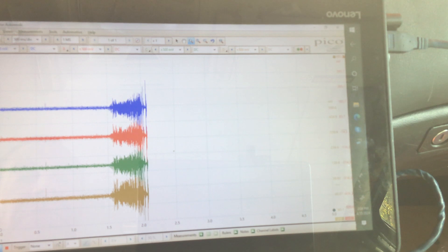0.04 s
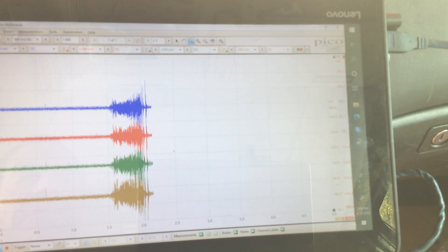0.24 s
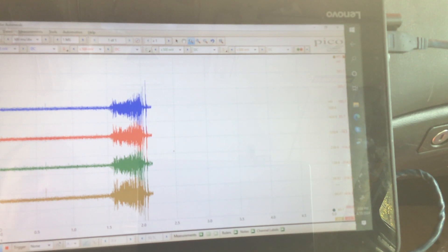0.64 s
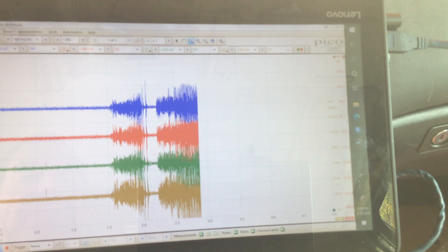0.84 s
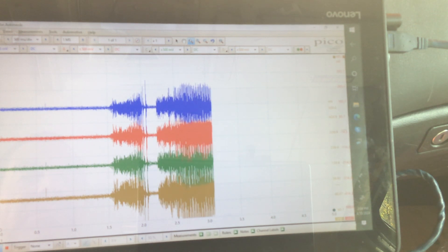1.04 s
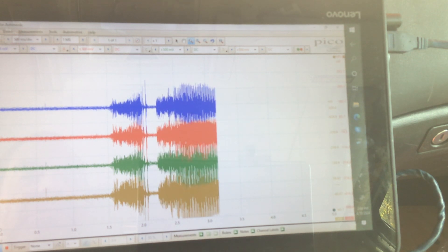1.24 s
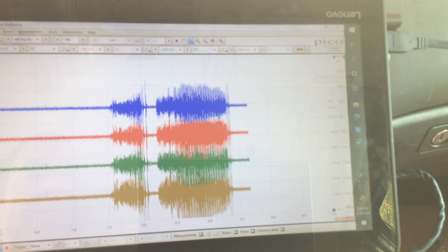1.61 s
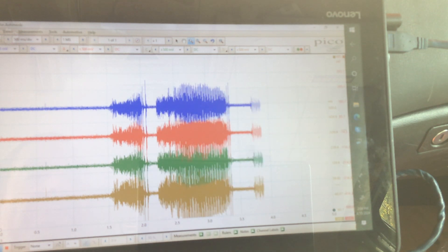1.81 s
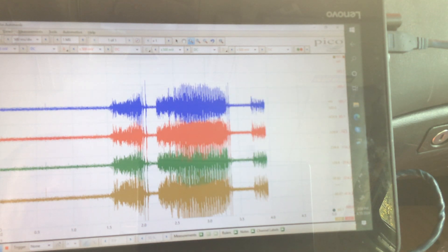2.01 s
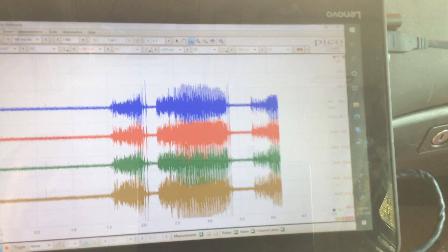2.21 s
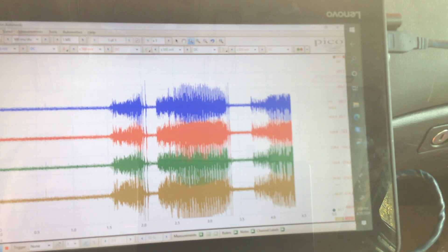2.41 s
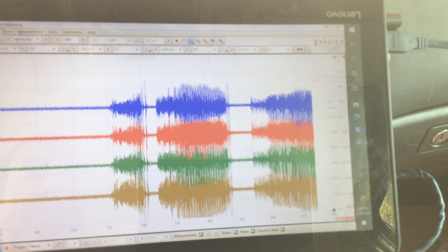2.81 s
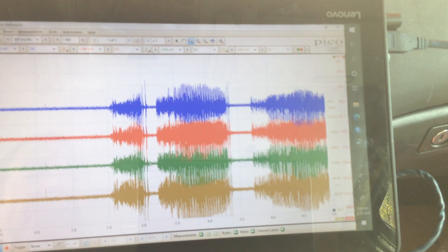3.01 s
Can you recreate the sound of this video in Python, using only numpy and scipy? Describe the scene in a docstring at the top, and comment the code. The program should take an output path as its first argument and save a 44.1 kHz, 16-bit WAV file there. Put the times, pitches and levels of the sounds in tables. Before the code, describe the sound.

A car's front suspension joint groans in swells as the steering turns, heard from inside.

```python
"""A front suspension joint groans by stick-slip friction as the steering of an idling car is worked to and
fro, heard from inside. Each stroke starts as an uneven rub, locks into regular slips near 120 Hz that
boom in the cabin and excite the body's resonances, then breaks up again; a third stroke just begins.
A hiss with narrow resonances, probably the steering fluid, follows the load. Short creaks and metallic
scrapes come within the strokes, and the engine hums underneath."""
import sys
import numpy as np
from scipy import signal
from scipy.fft import rfft, irfft, next_fast_len
from scipy.io import wavfile
from scipy.ndimage import map_coordinates

SR = 44100
rng = np.random.default_rng(int(sys.argv[2]) if len(sys.argv) > 2 else 0)


def put_to_file(sound):
    """Save the sound as 16-bit audio at rate SR, in the file named by the first command-line argument."""
    columns = np.atleast_2d(sound).T  # one column per channel
    safe = np.clip(columns, -1, 1)
    whole_steps = np.round(safe * 32767)
    wavfile.write(sys.argv[1], SR, whole_steps.astype(np.int16))


N = 138915

# resonances of body and cabin: f/Hz, half-width/Hz, relative level/dB
BODY_MODES = [(212, 18.3, 2.5), (289.4, 24, -4.5), (321, 11, -8.5), (389.8, 21.7, 1), (424, 16, -3.5),
              (446, 29, -9.5), (509.7, 13.5, -0.5), (560, 12, -14.5), (643.8, 17, -9), (675.5, 13, -4),
              (825.6, 34, -12.5), (861, 14, -23.5), (931, 26, -21.5), (998, 34, -15), (1076, 19, -13.5),
              (1135, 19, -18.5)]
# spectral envelope of hiss and buzz: f/Hz, relative level/dB
HISS_SPECTRUM = [(600, -15.5), (1150, -4), (1600, 1.5), (2100, -2.5), (2800, -3.5), (3050, -2),
                 (3750, -3.5), (4100, -9.5), (4450, -9), (4750, -12.5), (5600, -10), (6400, -17),
                 (7300, -15), (8100, -21.5), (9000, -20.5), (10300, -24.5), (12000, -34.5), (15500, -36)]
SLIP_PULSE_DEPTH = .14  # amplitude modulation of hiss and scrapes at the slip rate


def amp(db):
    """Amplitude ratio of a level in decibels."""
    return 10 ** (np.asarray(db) / 20)


def unit(x):
    """Normalisation to rms 1."""
    return x / np.sqrt(np.mean(x ** 2) + 1e-20)


def curve(rows):
    """Linear interpolation of (t/s, value) rows at every sample."""
    return np.interp(np.arange(N) / SR, *np.transpose(rows))


def wobble(knots_per_s):
    """Smooth random modulation: a spline through Gaussian values."""
    return map_coordinates(rng.standard_normal(N), [np.arange(N) * knots_per_s / SR + 2])


def colour(points, hz):
    """Spectral envelope: gain from (f/Hz, level/dB) points on a logarithmic frequency axis."""
    f, db = np.transpose(points)
    return amp(np.interp(np.log(hz + 1), np.log(f + 1), db))


def resonances(modes, hz):
    """Modal superposition: the gain is a sum of Lorentzian peaks."""
    return sum(amp(db) / (1 + ((hz - centre) / half_width) ** 2) for centre, half_width, db in modes)


def filtered(x, response):
    """Linear filtering: the spectrum is multiplied by a frequency response."""
    size = next_fast_len(N + SR // 2)
    return irfft(rfft(x, size) * response(np.fft.rfftfreq(size, 1 / SR)), size)[:N]


def noise(response):
    """Spectral shaping of white noise, at rms 1."""
    return unit(filtered(rng.standard_normal(N), response))


def ringing(modes):
    """Random excitation of resonances: bands of noise, together at rms 1."""
    return noise(lambda hz: resonances(modes, hz))


def cabin(x, t60_s=0.11, reflections_db=11.5):
    """Reverberation: dense reflections from glass and trim decay exponentially; the level is kept."""
    t = np.arange(SR // 5) / SR
    tail = rng.standard_normal(len(t)) * amp(-60 * t / t60_s)
    reflections = signal.fftconvolve(x, tail / np.linalg.norm(tail))[:N]
    return (x + amp(reflections_db) * reflections) / np.sqrt(1 + amp(reflections_db) ** 2)


def engine_idle(rumble_db=-47, waver_db=3.5):
    """Line spectrum over a continuum: the engine's wavering hum on a soft rumble."""
    # partials of the hum: f/Hz, level/dB
    partials = [(53, -60.5), (80.7, -53), (127, -54.5)]
    # spectral envelope of the rumble: f/Hz, relative level/dB
    spectrum = [(25, -22), (40, -18), (60, -4.5), (85, 2.5), (135, 6.5), (200, -13), (270, -7.5),
                (400, -23.5), (700, -21.5), (1000, -33.5), (1500, -28), (2500, -35.5), (3500, -35.5),
                (5000, -42.5), (8000, -49.5), (11000, -52.5), (15500, -62)]
    t, hum = np.arange(N) / SR, np.zeros(N)
    for hz, db in partials:
        hum += amp(db + waver_db * wobble(14)) * np.sin(2 * np.pi * hz * t + .5 * wobble(8.2))
    return np.sqrt(2) * hum + amp(rumble_db) * noise(lambda hz: colour(spectrum, hz))


def slip_buzz(phase):
    """Harmonics of a sharp edge: each slip carries high orders, scattered in phase and level."""
    edge = sum(np.cos(k * phase + rng.uniform(0, 2 * np.pi)) * amp(3 * wobble(12)) for k in range(10, 40))
    return unit(filtered(edge, lambda hz: colour(HISS_SPECTRUM, hz)))


def steering_hiss(phase, lock, rings_db=-5, buzz_db=-11, trim_db=0.5):
    """Amplitude modulation: hiss under load, with rings, buzz and a whistle, pulses with each slip."""
    # envelope of the hiss: t/s, relative level/dB
    hiss_level = [(0, -64), (.03, -72), (.08, -63), (.35, -60), (.47, -57), (.75, -56), (1.0, -56.5),
                  (1.19, -59.5), (1.225, -65), (1.39, -72.5), (1.52, -72), (1.56, -67), (1.73, -66),
                  (1.85, -56), (1.99, -58.5), (2.3, -57), (2.5, -57), (2.72, -60.5), (2.89, -58.5),
                  (2.92, -69.5), (3.09, -72), (3.13, -59), (3.15, -59)]
    # resonances of the metalwork: f/Hz, half-width/Hz, relative level/dB
    metal_modes = [(1465, 20, -4), (1530, 30, -4), (1737, 20, -1), (1883, 18, -1), (2022, 45, -2),
                   (2289, 16, -2), (2570, 70, -5), (3090, 45, -3), (3480, 110, -6), (3800, 40, -7),
                   (4310, 55, 0), (5070, 40, -11), (5830, 50, -12), (7472, 60, -14), (8630, 70, -16)]
    # bands of the first stroke's thin whistle: f/Hz, half-width/Hz, relative level/dB
    whistle_bands = [(7950, 110, -11), (8550, 95, 2)]
    # envelope of the whistle: t/s, level/dB
    whistle_level = [(0, -98), (.2, -91), (.36, -79.5), (.48, -77), (.75, -76.5), (.95, -80), (1.15, -82),
                     (1.25, -108)]
    broadband = unit(cabin(noise(lambda hz: colour(HISS_SPECTRUM, hz))))
    hiss = unit(broadband + amp(rings_db) * ringing(metal_modes))
    hiss += amp(buzz_db) * lock * slip_buzz(phase)
    hiss *= amp(curve(hiss_level) + trim_db)
    whistle = ringing(whistle_bands) * amp(curve(whistle_level))
    flicker = amp(0.27 * wobble(77))
    return (hiss + whistle) * (1 + SLIP_PULSE_DEPTH * np.sin(phase)) * flicker


def metal_scrapes(phase):
    """Noise-excited resonance: metal rings briefly, swelling and fading, pulsing at the slip rate."""
    # scrapes: start t/s, duration/s, level/dB, modes as (f/Hz, half-width/Hz, relative level/dB)
    scrapes = [(.7, 0.53, -60.5, [(2010, 100, -1), (2953, 25, 5), (3030, 50, -4.5), (3440, 120, -11.5),
               (5500, 720, -15.5), (13900, 1900, -32)]), (1.75, 0.28, -60.5, [(1520, 110, -2),
               (3210, 55, 0), (3530, 88, 0), (5320, 150, -7), (7000, 300, -15.5)])]
    t, out = np.arange(N) / SR, np.zeros(N)
    for start, duration, db, modes in scrapes:
        progress = np.clip((t - start) / duration, 0, 1)
        out += amp(db) * np.sin(np.pi * progress) * ringing(modes)
    return out * (1 + SLIP_PULSE_DEPTH * np.sin(phase))


def joint_creaks(scatter_rad=0.33):
    """Friction-excited resonance: single modes sing for a moment, gliding as the grip changes."""
    # creaks during uneven slipping: start t/s, duration/s, first f/Hz, last f/Hz, level/dB
    creaks = [(0.115, .13, 499, 493, -47), (.14, 0.13, 451.5, 381, -52), (0.159, 0.22, 690, 655, -53),
              (0.332, 0.13, 445, 384, -49.5), (1.701, 0.18, 427, 413.7, -44.5),
              (2.604, .1, 222.7, 224, -41), (2.773, .12, 408, 365, -51.5)]
    t, out = np.arange(N) / SR, np.zeros(N)
    for start, duration, first_hz, last_hz, db in creaks:
        progress = np.clip((t - start) / duration, 0, 1)
        phase = 2 * np.pi * np.cumsum(first_hz + (last_hz - first_hz) * progress) / SR
        out += amp(db) * np.sin(np.pi * progress) * np.sin(phase + scatter_rad * wobble(90))
    return np.sqrt(2) * out


def joint_rub(slips_per_s=1200, broadband_db=-4):
    """Shot noise: uneven slips knock the body's resonances at random moments, over a broad noise."""
    # spectral envelope between the resonances: f/Hz, relative level/dB
    spectrum = [(40, -38), (90, 0.5), (150, 0), (190, 0), (280, 2.5), (450, -19), (700, -12.5),
                (1100, -25.5), (1400, -24), (2500, -48), (6000, -79.5)]
    slips = (rng.random(N) < slips_per_s / SR) * rng.choice([-1, 1], N)
    strength = amp(1.3 * rng.standard_normal(N))
    ring = unit(filtered(slips * strength, lambda hz: resonances(BODY_MODES, hz)))
    return unit(ring + amp(broadband_db) * noise(lambda hz: colour(spectrum, hz)))


def cabin_boom(phase, trim_db=-0.35, shimmer_db=.2):
    """Forced vibration: the cabin booms at the fundamental of the slips."""
    # envelopes of the boom, one list for each full stroke: t/s, relative level/dB
    strokes = [
        [(.21, -78), (.243, -30), (.26, -29.5), (.29, -45), (.315, -50), (.338, -27), (.36, -26.5), (.385, -59),
         (.42, -30.5), (.48, -23), (.52, -21.5), (.6, -25), (.66, -30.5), (.73, -26.5), (.87, -27.5),
         (.99, -28), (1.06, -24.5), (1.11, -26), (1.15, -29.5), (1.195, -29), (1.225, -64)],
        [(1.52, -58), (1.575, -37), (1.61, -42.5), (1.68, -36.5), (1.76, -33.5), (1.81, -43), (1.87, -30.5),
         (1.92, -25), (2.0, -30), (2.08, -26), (2.17, -27), (2.29, -24), (2.41, -36), (2.48, -31),
         (2.55, -32.5), (2.61, -54), (2.65, -29.5), (2.7, -63), (2.74, -31), (2.765, -50), (2.8, -33.5),
         (2.85, -27), (2.9, -34), (2.94, -43), (2.99, -43)],
    ]
    t = np.arange(N) / SR
    envelope = sum(amp(curve(rows)) * (t > rows[0][0]) * (t < rows[-1][0]) for rows in strokes)
    return amp(trim_db + shimmer_db * wobble(45)) * envelope * np.sqrt(2) * np.sin(phase)


def joint_groan(phase, slip_hz, second_harmonic_db=4, flutter_db=1.5, scatter_rad_per_order=0.072):
    """Source and filter: harmonics of the regular slips swell as they cross the body's resonances."""
    out = np.zeros(N)
    for k in range(2, 11):
        gain = resonances(BODY_MODES, k * slip_hz)
        gain *= amp(second_harmonic_db * (k == 2) + flutter_db * wobble(24.48))
        offset = rng.uniform(0, 2 * np.pi) + scatter_rad_per_order * k * wobble(50)
        out += gain * np.sin(k * phase + offset)
    return unit(out)


def scene(groan_db=0.5, rub_db=2.5, rate_jitter=0.0057):
    """Stick-slip friction: the load is shared between groan and rub, and all sources superpose."""
    # repetition rate of the slips: t/s, f/Hz
    slip_rate = [(0, 132), (.14, 136), (.19, 126), (.29, 124), (.37, 128), (.41, 132), (.45, 121.8),
                 (.48, 122), (.56, 126.5), (.656, 132), (.732, 127), (.922, 128.6), (1.034, 124.7),
                 (1.075, 127), (1.13, 111), (1.2, 111), (1.55, 127), (1.68, 130), (1.74, 133), (1.8, 138),
                 (1.85, 130), (1.89, 116), (1.99, 108.7), (2.06, 112.6), (2.16, 111.2), (2.23, 113),
                 (2.3, 128.9), (2.45, 134.8), (2.5, 134), (2.56, 138), (2.62, 131), (2.73, 134), (2.8, 133),
                 (2.85, 123), (2.9, 114), (3.15, 130)]
    # regularity of the slips: t/s, lock (0 uneven, 1 periodic)
    regularity = [(0, 0.07), (.14, 0), (.36, 0.52), (.45, 0.95), (.8, 0.82), (1.03, 0.97), (1.1, 0),
                  (1.5, 0.17), (1.65, 0.54), (1.8, 0.34), (1.88, 0.7), (2.02, 0.75), (2.18, 1),
                  (2.25, 0.76), (2.32, 0.9), (2.5, 0.48), (2.6, .2), (2.75, 0), (2.85, 0.2), (3.15, 0.01)]
    # steering load, as the envelope of groan and rub: t/s, relative level/dB
    load = [(0, -72), (.03, -57), (.07, -46), (.17, -49.5), (.3, -44.5), (.4, -43), (.6, -41), (.8, -42.5),
            (1.03, -42), (1.1, -46), (1.19, -48), (1.23, -59), (1.35, -61.5), (1.51, -64), (1.56, -48),
            (1.7, -49.5), (1.79, -49.5), (1.88, -45), (2.1, -43.5), (2.3, -41), (2.65, -44.5), (2.89, -45),
            (2.93, -55), (3.0, -64), (3.09, -69), (3.12, -48.5), (3.15, -48)]
    slip_hz = curve(slip_rate)
    phase = 2 * np.pi * np.cumsum(slip_hz * (1 + rate_jitter * wobble(90))) / SR
    lock = np.clip(curve(regularity), 0, .97)  # some rub always remains
    groan = amp(groan_db) * np.sqrt(lock) * joint_groan(phase, slip_hz)
    rub = amp(rub_db) * np.sqrt(1 - lock) * joint_rub()
    joint = cabin_boom(phase) + amp(curve(load)) * (groan + rub) + joint_creaks()
    return (joint + steering_hiss(phase, lock) + metal_scrapes(phase) + engine_idle())[None]


def record(dry, low_cut_hz=35, top_hz=15700):
    """Band limiting: the microphone drops the deepest bass, and nothing passes above the top frequency."""
    return filtered(dry[0], lambda hz: (hz < top_hz) * hz ** 4 / np.sqrt(hz ** 8 + low_cut_hz ** 8))[None]


dry = scene()
out = record(dry)
put_to_file(out)
```